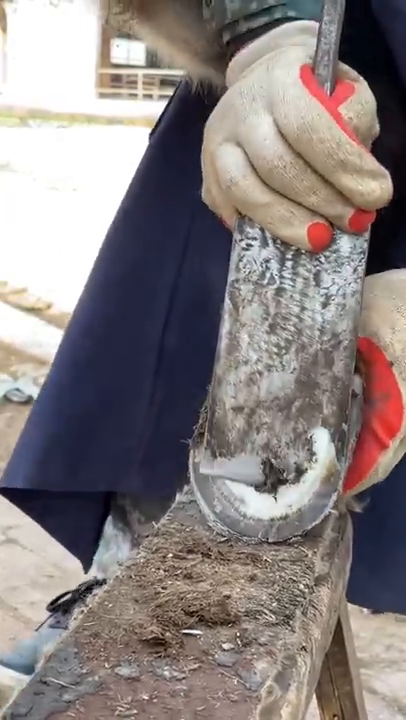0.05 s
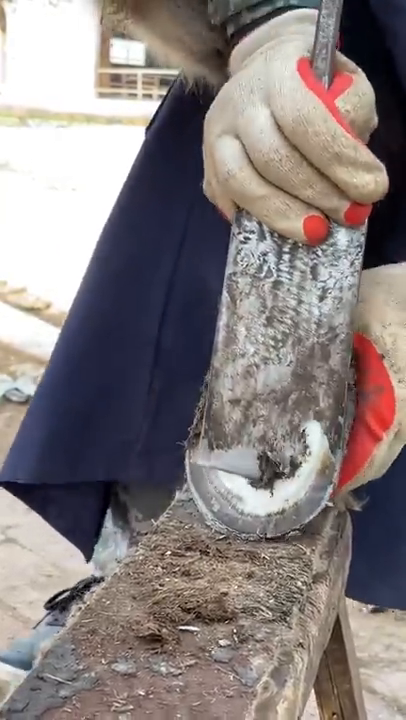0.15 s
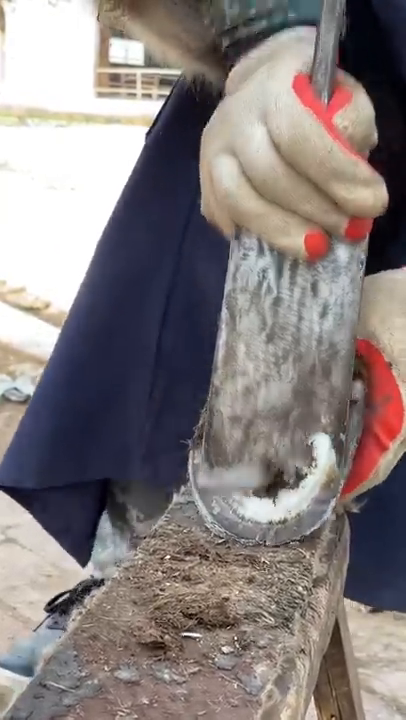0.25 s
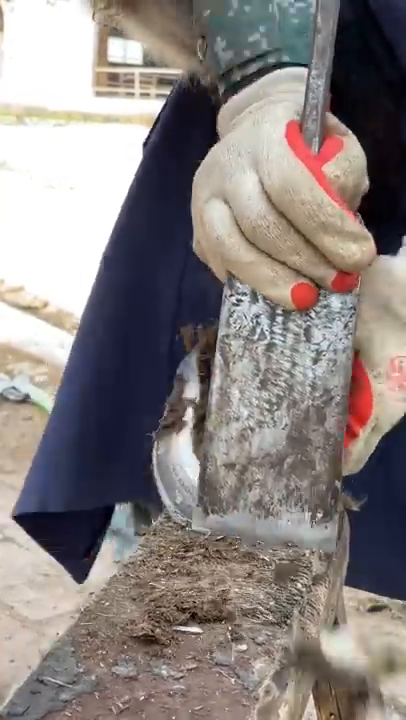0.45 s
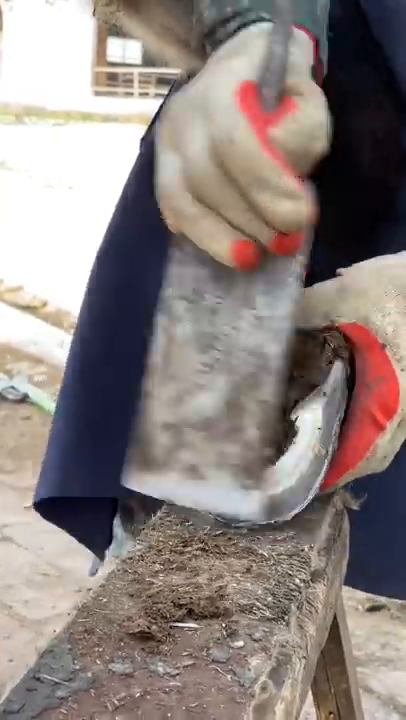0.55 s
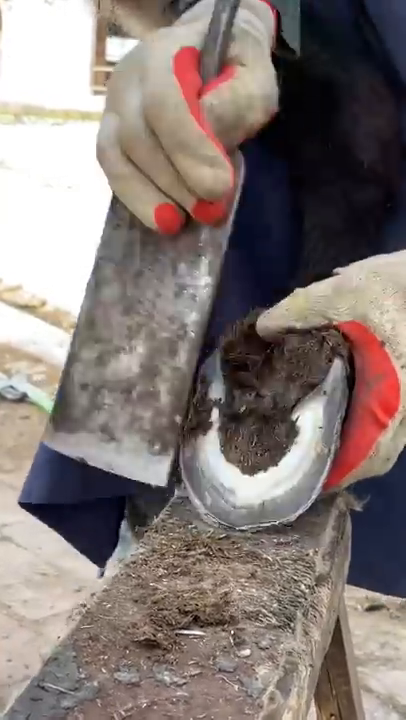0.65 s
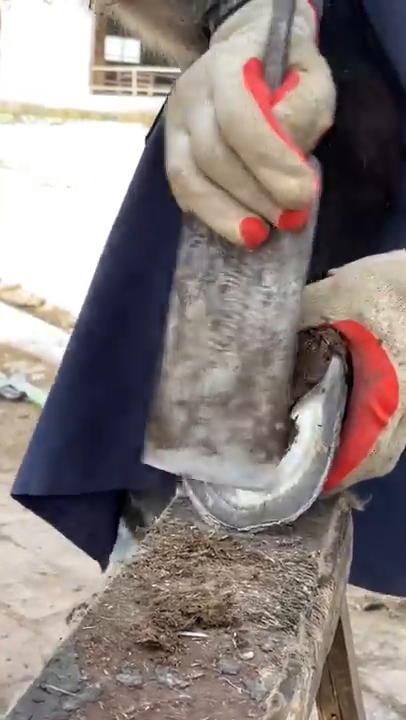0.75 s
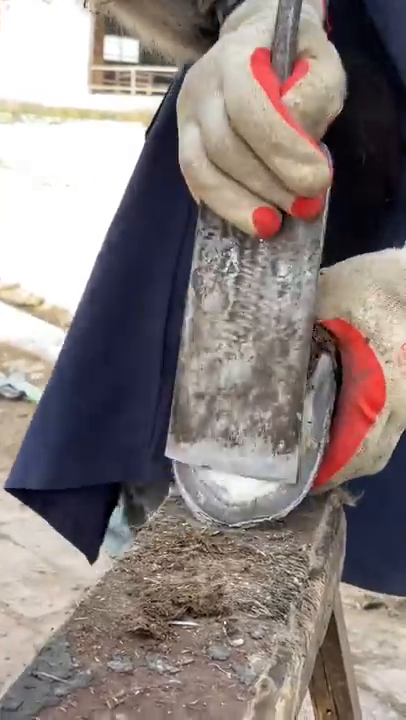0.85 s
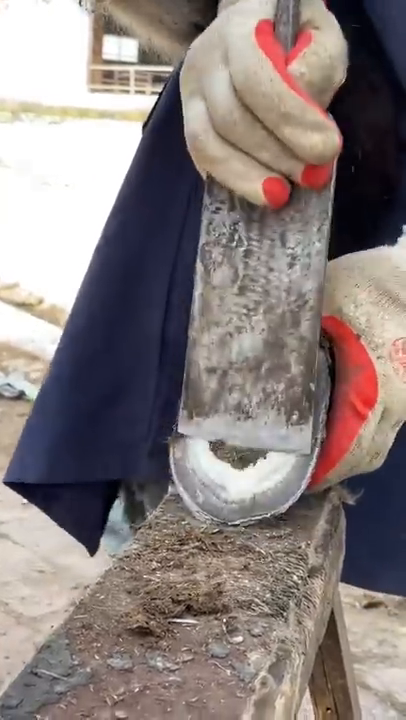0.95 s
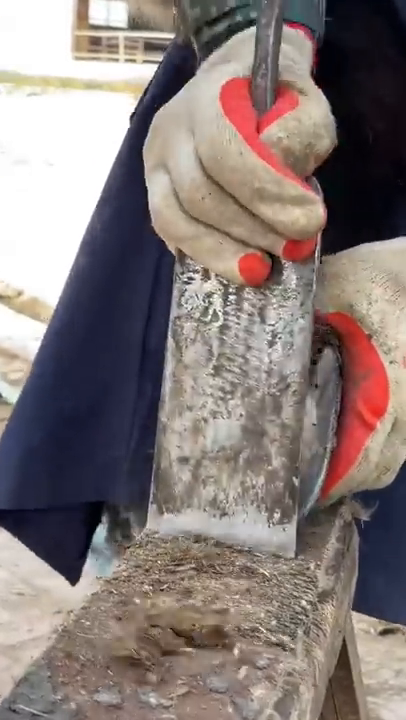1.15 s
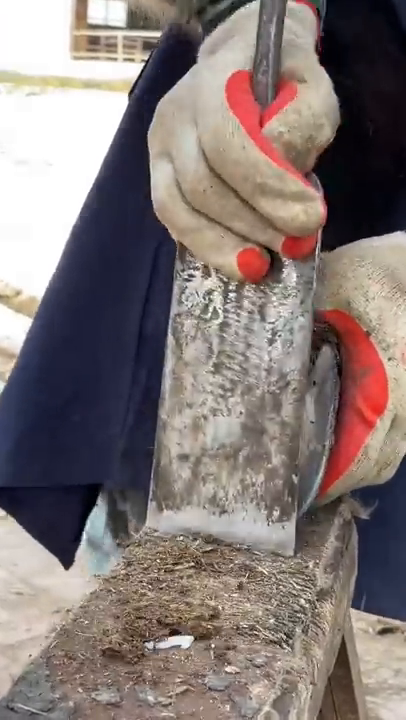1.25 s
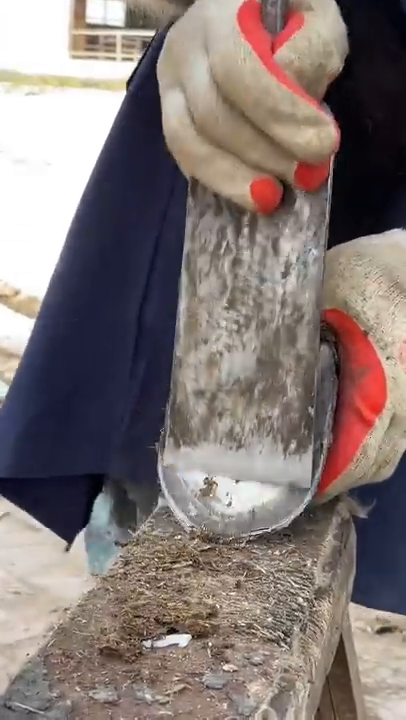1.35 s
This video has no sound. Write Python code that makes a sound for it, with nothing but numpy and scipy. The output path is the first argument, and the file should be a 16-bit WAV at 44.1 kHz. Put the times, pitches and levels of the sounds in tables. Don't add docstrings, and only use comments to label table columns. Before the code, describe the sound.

Hoof chopping with a flat steel blade on a wooden bench, heard close outdoors. Faint gritty scrapes and taps lead into a rising crunchy slice and loud, dry crack with a low bench thud at 0.26 s. Small ticks and scrapes follow, with a sharper knock at 0.73 s. A second, less bright chop lands at 1.04 s, a woody bump at 1.12, then light rubs with faint steel ring near 1.25. Soft wind rumbles throughout.

```python
import sys
import numpy as np
from scipy import signal
from scipy.fft import rfft, irfft
from scipy.io import wavfile
from scipy.ndimage import uniform_filter1d

SR = 44100
rng = np.random.default_rng(int(sys.argv[2]) if len(sys.argv) > 2 else 0)


def to_wav(sig):
    pcm = np.clip(np.atleast_2d(sig), -1, 1) * 32767
    pcm = np.round(pcm).astype(np.int16)
    wavfile.write(sys.argv[1], SR, pcm.T)


def volts(x):
    e = np.asarray(x, float) / 20
    return 10 ** e


N = 61739
T = np.arange(N) / SR
HZ = np.fft.rfftfreq(N, 1 / SR)
PIVOT_HZ = 3940


def evened(x):
    return x / np.sqrt(np.mean(x ** 2) + 1e-20)


def read(points, hz):
    f, value = np.transpose(points)
    return np.interp(np.log(hz + 1), np.log(f + 1), value)


def curve(points):
    s, db = np.transpose(points)
    return volts(np.interp(T, s, db))


def coloured(x, points, tilt_db=0.):
    hz = np.fft.rfftfreq(len(x), 1 / SR)
    gain_db = read(points, hz) + tilt_db * np.log2((hz + 900) / PIVOT_HZ)
    return evened(irfft(rfft(x) * volts(gain_db), len(x)))


def lumps(size, span):
    smooth = uniform_filter1d(rng.standard_normal(size), span)
    return evened(uniform_filter1d(smooth, span))


def add(mix, s, sound):
    part = mix[round(s * SR):][:len(sound)]
    part += sound[:len(part)]


def stroke(t, length, fall_db):
    attack_s, tail_t60 = 0.00045, 0.032
    hold_db = fall_db * np.minimum(t / length, 1)
    tail_db = -60 * np.maximum(t - length, 0) / tail_t60
    return np.minimum(t / attack_s, 1) * volts(hold_db + tail_db)


def air():
    # frequency in Hz, level in dB per Hz.
    rustle_colour = [(250, -20), (500, -17.5), (1200, -11.5), (2400, -18), (8000, -23), (11000, -18.5),
                     (12200, -92), (15400, -63)]
    # time in seconds, level in dB.
    rustle_level = [(0.0, -62), (0.13, -70), (0.26, -73.5), (0.38, -57), (0.524, -61), (0.794, -67),
                    (1.128, -58.5), (1.4, -67.5)]
    # frequency in Hz, level in dB per Hz.
    wind_colour = [(15, -56.5), (25, -2), (140, -2), (163, -5), (201, -11.5), (315, -14.5), (619, -24.5),
                   (730, -25), (900, -38), (1170, -74), (1980, -120)]
    # time in seconds, level in dB.
    gusts = [(0.0, -51), (0.314, -46.5), (0.742, -50), (1.062, -46), (1.4, -46.5)]
    # time in seconds, level in dB.
    whine_level = [(0.0, -97), (0.478, -57), (0.66, -58), (0.78, -68), (1.05, -66), (1.206, -54.5),
                   (1.4, -68)]
    whine_hz, width_hz, whine_db = 1680, 110, -0.5

    rustle = coloured(rng.standard_normal(N), rustle_colour) * volts(1.0 * lumps(N, span=300))
    rustle = rustle * curve(rustle_level) * volts(5.0)
    wind = coloured(rng.standard_normal(N), wind_colour) * volts(2.9 * lumps(N, span=900))
    wind = wind * curve(gusts) * volts(4.0)
    resonance = 1 / (1 + ((HZ - whine_hz) / width_hz) ** 2)
    whine = evened(irfft(rfft(rng.standard_normal(N)) * resonance, N))
    return rustle + wind + whine * curve(whine_level) * volts(whine_db)


def blade():
    # frequency in Hz, level in dB, 60 dB decay time in seconds.
    modes = [(2200, -3, .09), (3710, -8, .06), (4425, -5, .18), (4560, -7, .1), (6686, 0, .13),
             (7320, -15, .12)]
    # start in seconds, length in seconds, level in dB,
    # tilt in dB per octave.
    rubs = [
        (0.466, 0.024, -56, 3.5),
        (0.7286, 0.0063, -45.5, -12),
        (0.82, 0.049, -73, -4),
        (.981, 0.028, -49, -6),
        (1.246, .009, -41, 7),
        (1.33, 0.037, -63, 7),
    ]
    flutter_db = 3.5
    out, t = np.zeros(N), np.arange(12000) / SR
    for s, length, db, tilt_db in rubs:
        rub = rng.standard_normal(len(t)) * stroke(t, length, 0)
        ring = np.zeros(len(t))
        for hz, mode_db, t60 in modes:
            level_db = mode_db + tilt_db * np.log2(hz / PIVOT_HZ)
            ring += volts(level_db - 60 * t / t60) * np.sin(2 * np.pi * hz * t)
        rung = signal.fftconvolve(rub / np.linalg.norm(rub), ring)[:len(t)]
        add(out, s, volts(db) * rung * volts(flutter_db * lumps(len(t), span=150)))
    return out


def scrapes():
    # start in seconds, length in seconds, level in dB, tilt in dB per octave, change over the length in dB
    drags = [(.009, 0.013, -41, 4.5, -2.5), (0.0612, 0.0065, -46, -13, -2.5), (0.2135, 0.0035, -30, -1, 5),
             (0.219, 0.027, -33, 1.5, 5), (0.243, 0.021, -28, 0.5, 4), (0.2628, 0.0078, -12, 2.5, -6),
             (0.2671, 0.031, -16.5, -9.5, -20.5), (0.318, 0.021, -41, -4, -11),
             (0.4008, .031, -38.5, -3.5, -13.5), (0.4538, 0.0037, -38.5, -12, -3.5),
             (0.469, 0.016, -44, -4, -7), (0.563, 0.0053, -42, -0.5, -4.5),
             (0.7299, 0.013, -25.5, -5.5, -21), (0.7432, 0.014, -35.5, 6, -19.5),
             (.770, 0.009, -49, 4.5, -9), (0.8122, 0.002, -31, -1, -20), (.824, .010, -42, 4, -5),
             (.976, 0.018, -40, 0, -10.5), (1.0355, 0.004, -29, -1, 3.5), (1.0398, 0.0088, -17, -5, -12),
             (1.083, 0.0086, -26.5, -3.5, -31.5), (1.121, .012, -33.5, -2, -18.5),
             (1.211, .006, -45.5, -2, -5.5), (1.245, 0.011, -33.5, -1, -1),
             (.197, 0.024, -54.5, -2, 16.5), (0.288, 0.032, -44, -2.5, -6), (.354, 0.0079, -49.5, 7, -5),
              (0.362, 0.0054, -40.5, -14, -3.5), (0.378, 0.0026, -48, 2, -10),
              (0.4101, 0.0035, -38.5, 2, -7), (.4205, 0.0038, -41, 13, -3.5), (.6945, 0.0028, -61, 7, -10),
              (.836, 0.063, -59, 3.5, 5.5), (.931, 0.005, -46, -25, -3), (.958, 0.031, -57, -1, 7),
              (.996, 0.053, -53, 1, 11), (1.050, 0.03, -31, -11, -12.5), (1.068, 0.009, -49, -1, 0),
              (1.233, 0.03, -51, 1.5, 3.5), (1.2634, .065, -46.5, 3, -5), (1.325, .05, -52, 3, -7),
              (.0475, .005, -47, -14, -4), (.8125, .005, -33, -14, -10), (.2742, .002, -21, -1, -6),
              (1.045, .008, -24, -12, -6)]
    # frequency in Hz, level in dB per Hz.
    grit = [(180, -38), (300, -9), (571, -8), (2360, -3), (4950, -8.5), (6880, -5), (9110, -0.5),
            (11700, -10), (13800, -21), (15400, -38)]
    # frequency in Hz, width in Hz, level in dB over the grit.
    singing = [(1280, 90, 6), (2410, 90, 6), (3500, 120, 6), (4250, 120, 4), (5740, 140, 5), (6690, 120, 7),
               (7330, 120, 5), (8110, 150, 6), (9000, 150, 5), (10400, 150, 5)]
    grainy_db = 2.0
    soft_hz, hard_db, soft_loss = 11840, -28, 1.7

    out, t, hz = np.zeros(N), np.arange(4096) / SR, np.fft.rfftfreq(4096, 1 / SR)
    bands = 1 + sum((volts(db) - 1) / (1 + ((hz - f) / width) ** 2) for f, width, db in singing)
    for s, length, db, tilt_db, fall_db in drags:
        grains = coloured(rng.standard_normal(len(t)), grit, tilt_db)
        grains = grains * volts(grainy_db * lumps(len(t), span=24))
        top = volts(soft_loss * min(db - hard_db, 0) * np.maximum(hz - soft_hz, 0) / 1000)
        sound = evened(irfft(rfft(grains) * top * bands))
        add(out, s, volts(db) * stroke(t, length, fall_db) * sound)
    return out


def knocks():
    # start in seconds,
    # peak in dB, frequency in Hz, 60 dB decay time in seconds.
    blows = [(.2628, -13, 6080, .012), (.263, -19, 5610, .014), (.2632, -12, 7840, .019),
             (.2645, -14, 9000, .018), (.264, -17, 3530, .014), (.2635, -20, 11200, .012),
             (.2742, -17, 2600, .005), (.215, -27, 2400, .008), (.2152, -28, 5400, .007),
             (.2154, -29, 3600, .007), (.2148, -29, 1500, .009), (.2155, -31, 11000, .006),
             (.2664, -16.5, 2015, 0.029), (.2668, -15.5, 2355, 0.025), (.2682, -7.5, 1184, 0.015),
             (.2682, -15.5, 452.3, 0.017), (.2701, -15.5, 698, 0.021), (.2736, -18, 1197, 0.01),
             (1.0397, -14, 1866, .011), (1.0398, -19, 2990, .009), (1.0398, -19, 3570, .009),
             (1.0396, -22, 4540, .007), (1.0358, -25, 6600, .012), (1.0398, -24, 6120, .007),
             (1.04, -22, 9750, .009), (1.0385, -24, 11400, .012), (1.0472, -11, 1050, .008),
             (1.0424, -8, 600, 0.013), (1.0424, -4, 962, 0.013), (1.043, -8, 1300, 0.015),
             (1.0512, -29, 1315, 0.034), (1.1222, -15, 570, 0.010), (1.1278, -18, 350, .011)]
    # start in seconds, peak in dB,
    # frequency in Hz, 60 dB decay time in seconds.
    thuds = [(0.0466, -27, 285, 0.022), (.2725, -17, 234.6, 0.041), (0.2764, -11, 121.3, 0.039),
             (0.285, -16, 76.6, 0.067), (0.341, -23, 141, 0.027), (0.4243, -33, 343, 0.028),
             (.577, -35, 125, .05), (.655, -33, 135, .09), (0.74, -37, 137.4, 0.053),
             (1.0484, -25, 254, 0.029), (1.0503, -21.5, 121.4, 0.055), (1.055, -23.5, 69.3, 0.13),
             (1.124, -23, 220, 0.032), (1.277, -40, 126, 0.11)]
    # start in seconds, peak in dB, frequency in
    # Hz, 60 dB decay time in seconds.
    taps = [(.0597, -29.5, 1640, 0.0061), (.2068, -31, 1080, 0.021), (.4016, -26.5, 2290, 0.0082),
            (.4524, -18, 1650, 0.0047), (.4762, -55, 1080, 0.011), (.5621, -37, 4590, .02),
            (.5680, -42, 1610, 0.018), (.6571, -44.5, 2440, 0.03), (.7291, -22, 1700, 0.008),
            (.7293, -23, 4610, 0.017), (.7321, -23, 756, 0.045), (.7293, -34, 2200, .09),
            (.748, -40, 3710, .04), (.770, -40, 7700, .03), (.7445, -36, 9100, .012),
            (.8245, -38, 9000, .015), (.8245, -38, 11100, .015), (.8135, -32, 1400, .015),
            (.8121, -17, 1080, 0.0042), (.8124, -23, 2060, 0.045), (.9868, -32, 1610, 0.018),
            (1.084, -26, 2250, 0.018), (1.085, -30, 1950, .02), (1.2488, -32.5, 2234, 0.037),
            (1.2115, -40, 2500, .02), (1.253, -43, 6686, .2), (1.256, -48, 4440, .2),
            (.5625, -38, 3950, .02), (.401, -33, 1950, .02), (.476, -40, 850, .02)]
    rise_cycles, choke, free = 0.4, 1.63, 0.87

    out, t = np.zeros(N), np.arange(8192) / SR
    for rows, shape in ((blows + thuds, choke), (taps, free)):
        for s, db, hz, t60 in rows:
            decay = volts(db - 60 * (t / t60) ** shape)
            swell = (1 - np.exp(-t * hz / rise_cycles)) ** 2
            add(out, s, decay * swell * np.sin(2 * np.pi * hz * t))
    return out


def scene():
    # frequency in Hz, level in dB.
    unshared = [(60, -30), (300, -12), (900, -7), (2000, -16), (4000, -22), (6000, -40)]
    echo_db, echo_t60 = -8, .008
    near, other = air(), air()
    work = scrapes() + knocks() + blade()
    reflections = rng.standard_normal(1024) * volts(-60 * T[:1024] / echo_t60)
    echo = volts(echo_db) * signal.fftconvolve(work, reflections / np.linalg.norm(reflections))[:N]
    apart = irfft(rfft(other + echo) * volts(read(unshared, HZ)), N)
    return np.array([near + work + apart, near + work - apart])


def top_cut(x):
    return signal.sosfilt(signal.butter(12, 15590, fs=SR, output="sos"), x)


def record(dry):
    # frequency in Hz, turn in radians.
    channel_turn = [(0, 0), (4500, 1.1), (4950, 3.14), (5400, 5.9), (8600, 9.38), (9500, 9.47), (12000, 12.5),
                    (13500, 12.57), (14100, 14.0), (22050, 14.0)]
    # frequency in Hz, left over right in dB.
    channel_gain = [(60, -1), (130, -1.8), (290, -4), (640, -5), (1410, -.5), (3100, 0), (6810, 0), (15000, 0)]
    limit, top_hz = 1.15, 15650
    turn = np.interp(HZ, *np.transpose(channel_turn))
    gain = volts(read(channel_gain, HZ) / 2)
    response = np.array([gain * np.exp(.5j * turn), np.exp(-.5j * turn) / gain])
    low_cut = 1 + (36 / (HZ + 1)) ** 4
    channels = irfft(rfft(dry) * response / low_cut, N)
    limited = limit * np.tanh(channels / limit)
    return top_cut(irfft(rfft(limited) * (HZ < top_hz), N))


dry = scene()
out = record(dry)
to_wav(out)
```